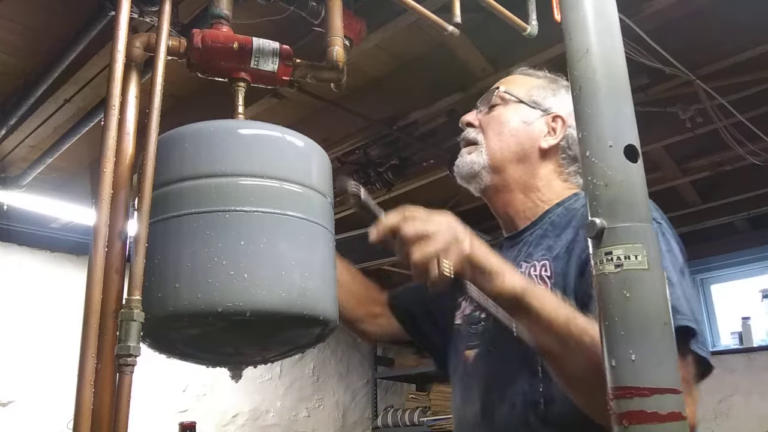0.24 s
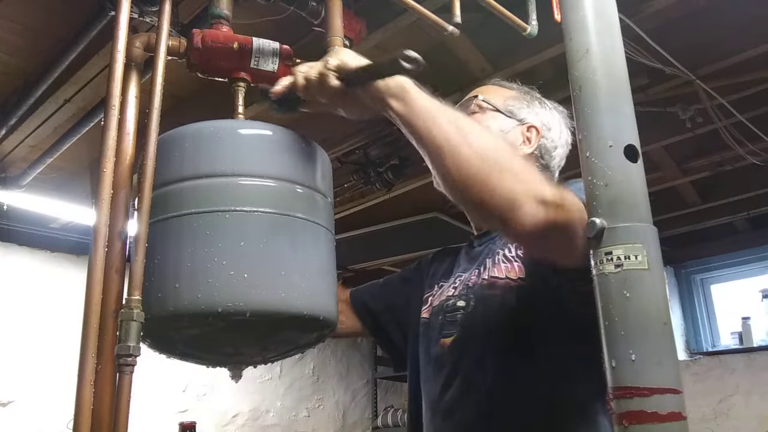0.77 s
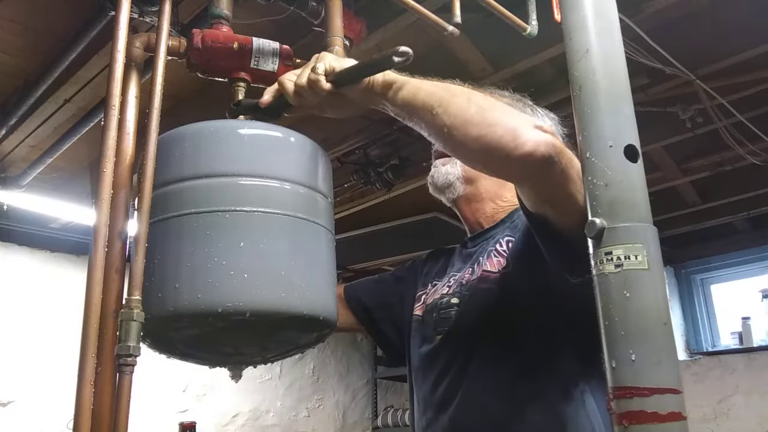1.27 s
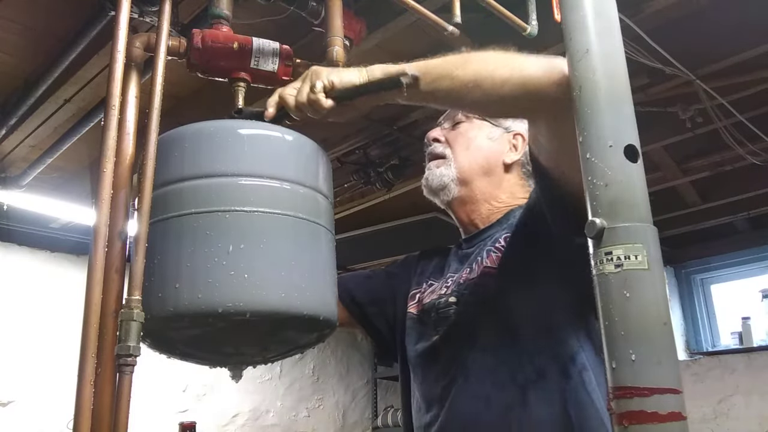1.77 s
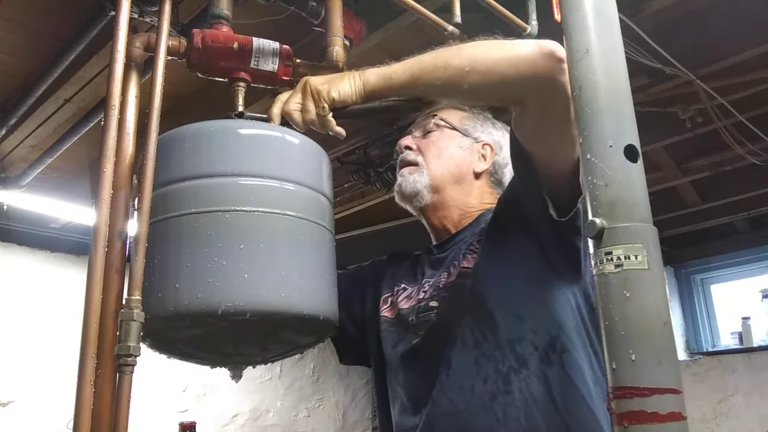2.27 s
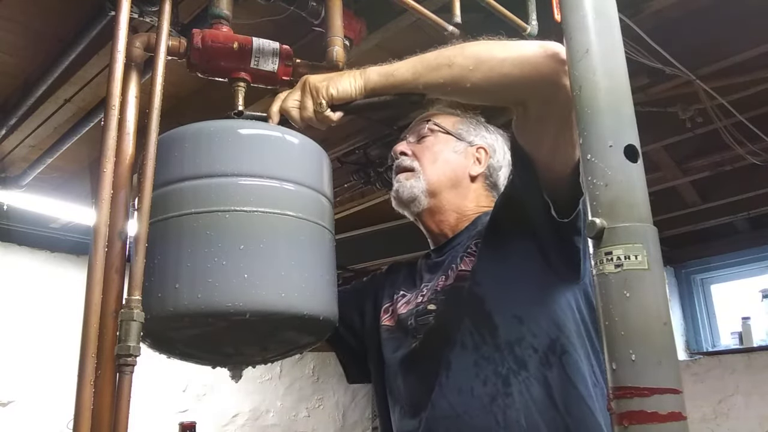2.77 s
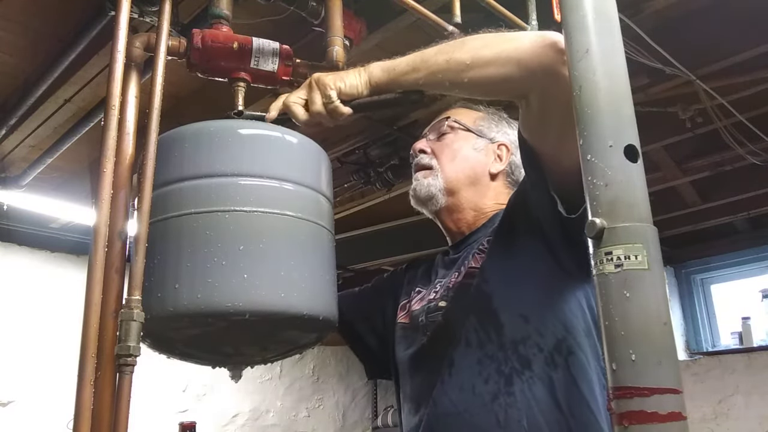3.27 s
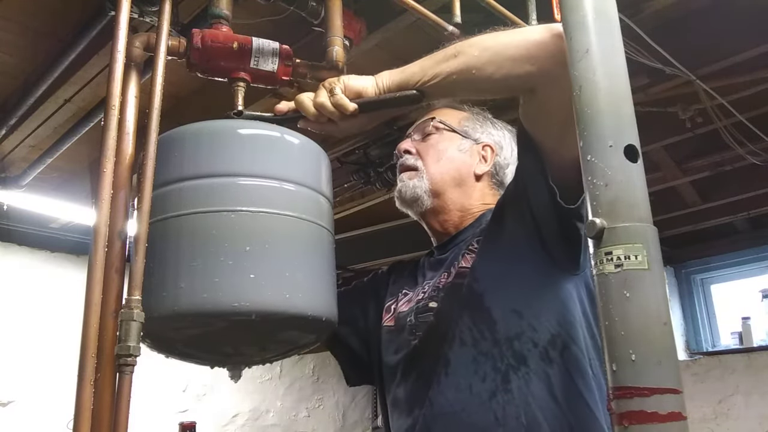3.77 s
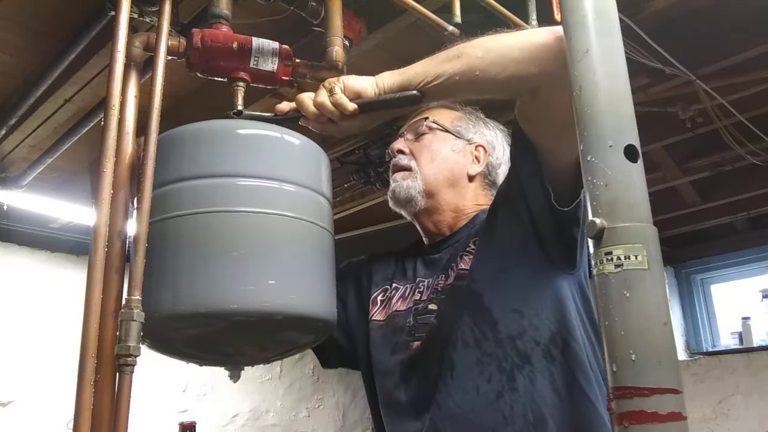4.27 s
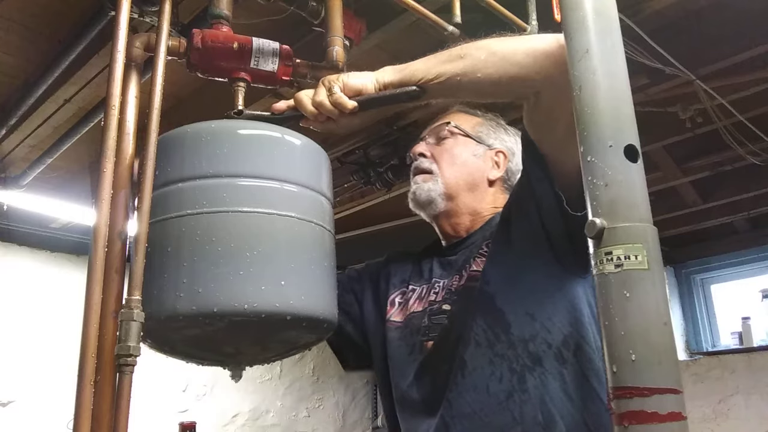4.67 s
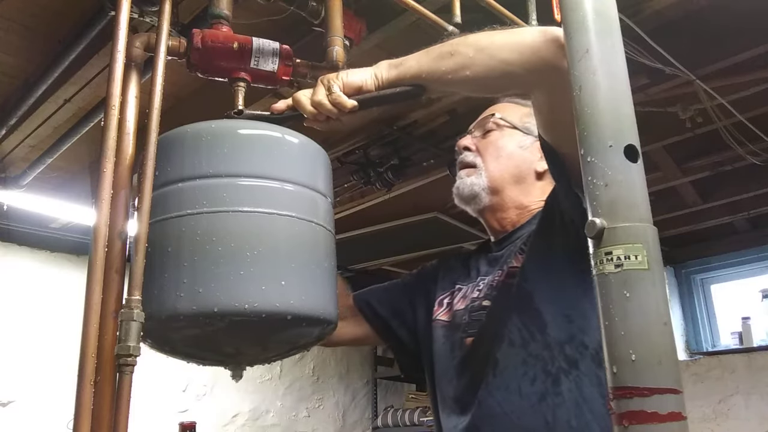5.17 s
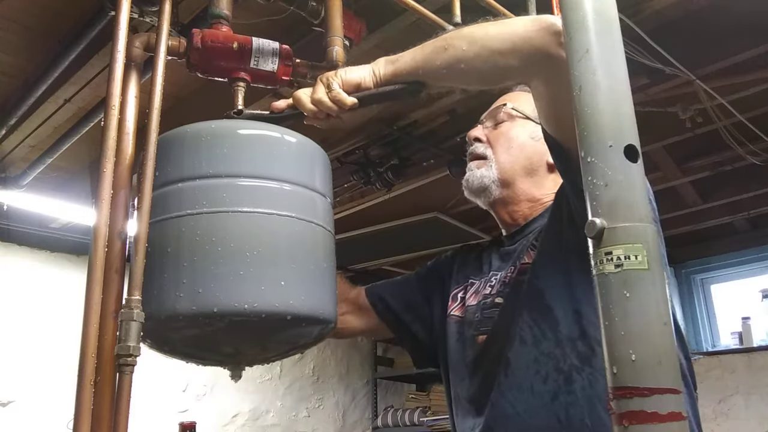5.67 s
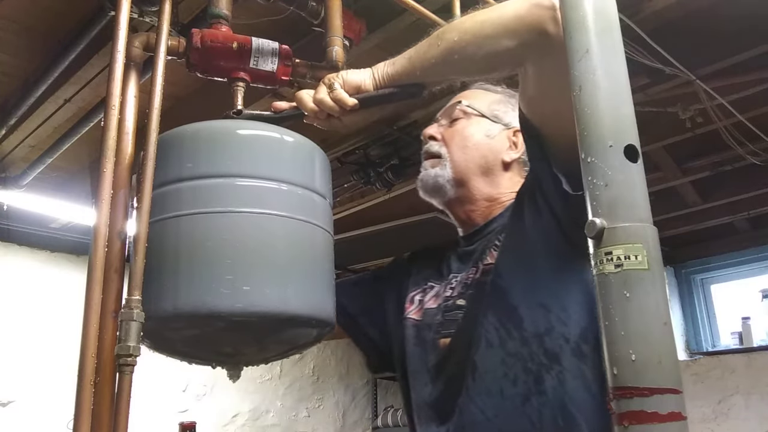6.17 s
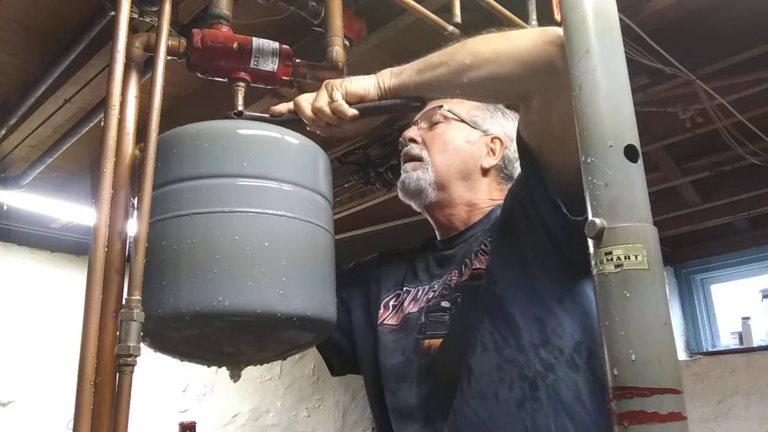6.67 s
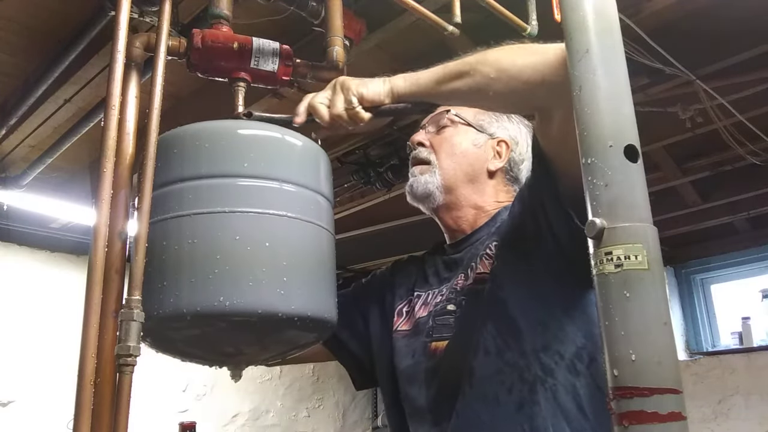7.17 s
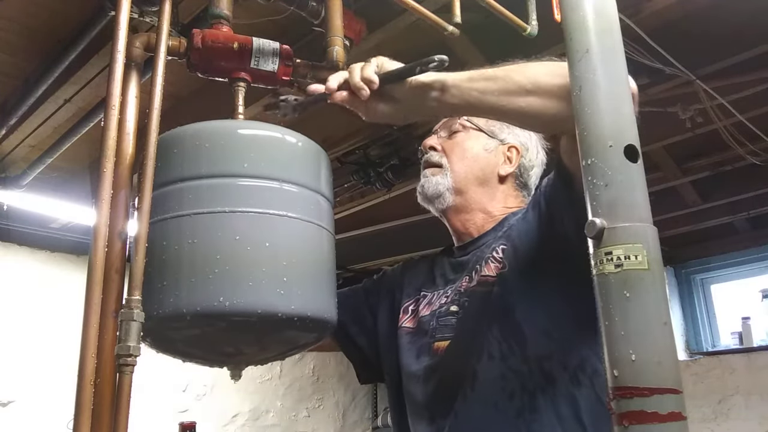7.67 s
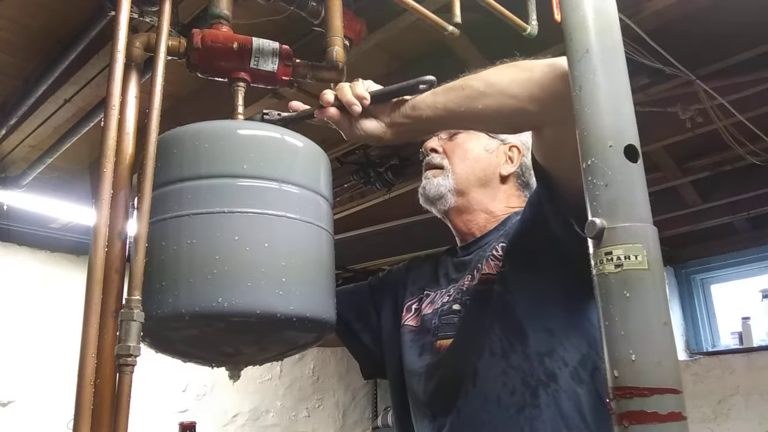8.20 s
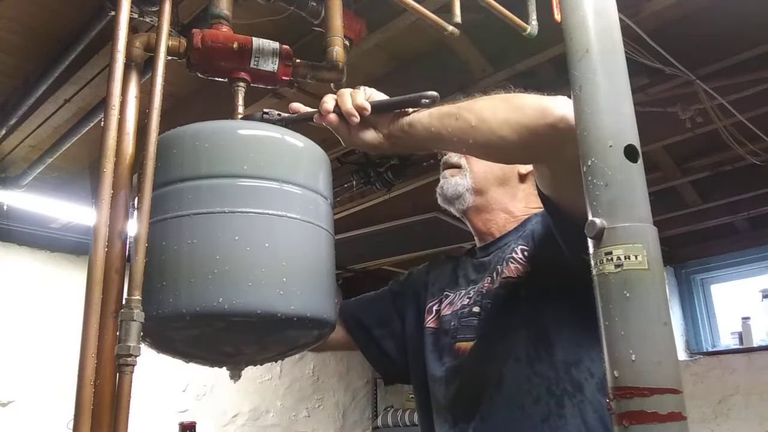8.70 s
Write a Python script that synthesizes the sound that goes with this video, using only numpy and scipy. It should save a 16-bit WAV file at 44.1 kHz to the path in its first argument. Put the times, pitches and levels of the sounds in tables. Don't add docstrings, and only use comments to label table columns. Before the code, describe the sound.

In a basement, a steel wrench works on a brass fitting above a hollow tank. Bright clinks and duller knocks come in uneven clusters, with faint scraping and rattling between them. The loudest clank falls just past the middle, with another knock right after it; a busier run of small taps ends with a sharp clink. A small, thin-sounding microphone catches a short room tail and soft hiss.

```python
import sys
import numpy as np
from scipy import signal
from scipy.fft import rfft, irfft
from scipy.io import wavfile
from scipy.ndimage import uniform_filter1d

SR = 44100
rng = np.random.default_rng(int(sys.argv[2]) if len(sys.argv) > 2 else 0)


def boost_factor(decibels):
    exponent = np.asarray(decibels, float) / 20
    return 10 ** exponent


def pcm_store(signal):
    levels = np.round(np.clip(np.atleast_2d(signal), -1, 1) * 32767)
    wavfile.write(sys.argv[1], SR, levels.astype(np.int16).T)


N = 394254

# pitch in Hz, level in dB, time to fade by 60 dB in seconds.
WRENCH_MODES = [(1930, -6.5, 0.07), (2014, 6.5, 0.025), (2102, -2, 0.034), (2236, 1, 0.017),
                (2434, -2.5, 0.012), (2760, -5, 0.03), (3450, -7, .03), (4030, -5, 0.016),
                (4355, -13.5, 0.027), (4820, -13, 0.022), (4784, -11.5, 0.024), (5740, -19, 0.02),
                (6080, -18, .02), (7350, -30, 0.024)]
# pitch in Hz, level in dB, time to fade by 60 dB in seconds.
FITTING_MODES = [(2370, 0, 0.037), (2455, 3.5, 0.05), (2577, 4, 0.048), (2700, -3.5, 0.047),
                 (2980, -0.5, 0.034), (3150, -6.5, 0.021), (3370, -2.5, 0.041), (3440, -7, .045),
                 (3610, -3.5, 0.08), (3840, -7.5, 0.042), (4395, -2.5, 0.086), (5330, -14, 0.03),
                 (6300, -36.5, 0.027), (7130, -31.5, .035)]
# pitch in Hz, level in dB, time to fade by 60 dB in seconds.
TANK_MODES = [(185, -25.5, 0.019), (267.4, -13, 0.11), (314.2, -8, 0.05), (367, -7, 0.085),
              (420.8, -15, 0.18), (460.5, -12, 0.11), (480, -10.5, 0.05), (556, -7, 0.056),
              (621.8, -4.5, 0.055), (658, -12.5, 0.028), (762.3, -1.5, 0.032), (839, -6, 0.036),
              (962, -8, 0.023), (1128, -5, 0.014), (1320, -18, 0.032), (1438, -7, 0.0088),
              (1740, -11.5, 0.03)]
# pitch in Hz, level in dB, time to fade by 60 dB in seconds.
SWAY_MODES = [(160, -8, 0.04), (185, -0.5, 0.09), (220, -7, 0.05), (250, -7, 0.2)]
# pitch in Hz, level in dB.
PIPES = [(1500, -30), (2000, -1), (2500, 2), (3500, 3.5), (4500, -4), (5200, -15), (6400, -30)]
# pitch in Hz, level in dB.
SHELL = [(220, -10), (330, -2), (470, -2), (640, 0), (850, -5), (1300, -11), (1900, -20)]
# pitch in Hz, level in dB.
CRACK_COLOUR = [(150, -44), (500, -23.5), (1200, -7.5), (2500, 2.5), (4500, 3.5), (6500, -5), (8000, -13),
                (12000, -13.5), (16000, -22)]
PIPES_T60_S, SHELL_T60_S = 0.084, 0.055


def touches():
    out = np.zeros(N)
    bodies = [small_part(WRENCH_MODES), small_part(FITTING_MODES), tank(), rings(SWAY_MODES),
              pipework(PIPES, PIPES_T60_S), pipework(SHELL, SHELL_T60_S, count=50)]
    offsets_db = [-11.5, -5.5, -8, -17, -9.5, -5]
    for s, wrench_db, fitting_db, tank_db, crack_db, length_ms in contacts():
        chatter, fade = jaw_chatter(max(length_ms, .3) / 1000)
        held_db = 12 * max(-36.5 - max(wrench_db, fitting_db, tank_db), 0)
        levels_db = np.add([wrench_db, fitting_db, tank_db, tank_db, fitting_db, tank_db], offsets_db)
        for body, db in zip(bodies, levels_db):
            sound = struck(body, chatter, spread_db=2.5)
            add(out, s - .0002, boost_factor(db - held_db * np.arange(len(sound)) / SR) * sound)
        rough = chatter + 0.4 * rng.standard_normal(4096) * fade
        crack = coloured(np.roll(rough, 64), CRACK_COLOUR)
        loudest = np.sqrt(uniform_filter1d(crack ** 2, 400).max())
        add(out, s - .0016, boost_factor(crack_db + 6.0) * crack / loudest)
    return out


# start in seconds, then wrench, tank and crack level in dB.
CLINKS = [(0.4943, -23, -47, -48), (0.6436, -30, -48, -52), (1.7895, -48.5, -57, -88),
          (3.0475, -34.5, -47, -50), (3.1759, -43, -43, -53), (3.182, -38, -50, -51),
          (3.479, -51, -60.5, -66), (4.547, -30, -41, -59), (4.674, -12, -37, -34),
          (4.679, -15.5, -39, -33), (5.0451, -42, -50, -81), (5.132, -42.5, -53.5, -88),
          (5.169, -39, -56, -73), (5.1801, -46, -49, -67), (5.4535, -35.5, -42.5, -54),
          (5.7953, -54, -50, -80), (6.474, -38, -40.5, -59), (6.6682, -54, -58, -71),
          (6.7943, -29.5, -46, -55), (6.934, -42, -58, -81), (7.6012, -49, -59.5, -92),
          (8.214, -46.5, -53, -63), (8.5576, -41, -40, -62), (8.6214, -31, -48, -52),
          (8.7841, -35, -39.5, -62), (8.9028, -24, -41, -41)]
# start in seconds, then fitting, tank and crack level in dB.
KNOCKS = [(1.2212, -29, -38.5, -66), (1.226, -37, -42, -67), (1.3342, -26, -36, -44), (1.34, -32, -38, -52),
          (1.5678, -89, -59, -60.5), (1.9983, -50, -49.5, -71), (2.0837, -53, -58, -68),
          (2.1935, -41, -34, -58), (2.204, -50, -39, -70), (3.424, -69, -64, -68), (4.491, -42, -51, -57),
          (4.7955, -32, -28.5, -31.5), (4.802, -24.5, -36, -37.5), (5.4343, -39.5, -45, -54),
          (5.5249, -48, -49.5, -58.5), (6.8938, -43.5, -56, -63), (7.1988, -58, -52.5, -74),
          (7.477, -76, -72, -73.5), (7.677, -42.5, -48.5, -52.5), (7.8873, -33, -34, -48),
          (7.955, -42, -38, -76), (8.076, -50.5, -50, -81), (8.154, -41.5, -43, -76),
          (8.167, -51, -52.5, -69), (8.3774, -45, -38, -61)]
# start in seconds, then tank and wrench level in dB.
BUMPS = [(1.9197, -52.5, -59), (2.604, -48.5, -62), (4.5185, -42, -44), (5.562, -52.5, -57),
         (6.0918, -55.5, -62), (6.135, -53.5, -62.5), (6.6046, -53, -53), (6.838, -47.5, -63),
         (7.2552, -61, -70.5), (8.3097, -55, -58), (8.4919, -46, -56)]
# start in seconds, fitting, tank and crack level in dB.
SEATINGS = [(.004, -72, -72, -68), (0.3827, -64, -50.5, -53.5), (0.397, -41, -51, -46),
            (.828, -61, -59, -53), (2.446, -56, -53, -60.5), (2.766, -44.5, -57.5, -67),
            (4.588, -50.5, -62, -52), (8.039, -54, -46.5, -75), (2.328, -55, -46, -62),
            (2.3621, -49, -51, -54), (2.655, -73, -78, -66.5), (3.269, -74, -75, -64),
            (3.8, -82, -75, -70.5), (4.234, -48.5, -52, -65), (7.1, -47.5, -49, -76),
            (8.8079, -57, -36, -55.5)]


def contacts():
    rows = []
    for s, wrench, tank_db, crack in CLINKS:
        rows.append((s, wrench, wrench - 13.5, tank_db, crack, blow_ms(wrench)))
    for s, fitting, tank_db, crack in KNOCKS:
        rows.append((s, fitting - 24, fitting, tank_db, crack, blow_ms(fitting)))
    for s, tank_db, wrench in BUMPS:
        rows.append((s, wrench, wrench - 5.5, tank_db, tank_db - 22, 10.6))
    for s, fitting, tank_db, crack in SEATINGS:
        rows.append((s, fitting - 13, fitting, tank_db, crack, 13.6))
    return rows


def blow_ms(db):
    return 6.73 + 0.01 * db


def jaw_chatter(length):
    t = np.arange(4096) / SR
    late = boost_factor(-12) * np.exp(-t / (4.4 * length))
    seating = np.minimum(t / (0.31 * length), 1)
    fade = (np.exp(-t / length) + late) * (t < .08) * seating
    chatter = rng.standard_normal(4096) * (rng.random(4096) < .06) * fade
    chatter[20] = 0.8
    return chatter, fade


def struck(modes, chatter, spread_db):
    hz, sines = modes
    bins = np.round(np.array(hz) * 8192 / SR).astype(int)
    push = abs(rfft(chatter, 8192))[bins]
    weights = boost_factor(spread_db * rng.standard_normal(len(push))) * rng.choice([-1, 1], len(push))
    even_push = np.maximum(push, 0.37 * np.linalg.norm(chatter))
    sound = signal.fftconvolve(weights / even_push @ sines, chatter)
    return sound / np.sqrt(uniform_filter1d(sound ** 2, 400).max())


def rings(modes):
    hz, db, t60 = np.transpose(modes)[:, :, None]
    t = np.arange(int(min(t60.max(), .65) * SR) + 200) / SR
    return hz[:, 0], boost_factor(db - 60 * t / np.maximum(t60, .002)) * np.sin(2 * np.pi * hz * t)


def split(modes, apart_hz, count=5):
    hz, db, t60 = np.repeat(modes, count, axis=0).T
    step = np.tile(np.linspace(-1, 1, count), len(modes)) + 0.35 * (rng.random(len(hz)) - .5)
    return np.transpose([hz + step * np.repeat(apart_hz, count), db, t60])


def small_part(modes):
    hz, sines = rings(split(modes, .016 * np.array(modes)[:, 0]))
    return hz, signal.sosfilt(signal.butter(2, 1500, "high", fs=SR, output="sos"), sines)


def tank():
    return rings(split(TANK_MODES, .032 * np.array(TANK_MODES)[:, 0], count=3))


def pipework(shape, t60, count=200):
    place, size, ring = rng.random((count, 3)).T
    hz = np.linspace(shape[0][0], shape[-1][0], count) * (1 + 0.01 * place)
    return rings(np.transpose([hz, -9.0 * size + read(shape, hz), t60 * (0.54 + ring)]))


# start in seconds, level in dB, pitch in Hz, fade time
# in seconds.
LOOSE_SPOTS = [(.398, -43.5, 3320, 0.088), (.4945, -41, 2070, 0.05), (.6442, -48, 1930, 0.053),
               (.83, -50.5, 1740, 0.044), (.83, -65, 6450, .06), (.4945, -43, 3380, 0.04),
               (.6442, -38, 2100, .05), (1.2214, -42, 658, 0.06), (1.2214, -38, 4440, .06),
               (1.3344, -48, 3770, 0.47), (1.3344, -39, 620, .06), (1.3344, -28.5, 4510, .03),
               (1.9993, -42.5, 1330, 0.0032), (2.1939, -37, 3310, 0.11), (2.204, -41, 630, 0.05),
               (2.1939, -39, 2470, 0.044), (3.0486, -46.5, 2770, .03), (4.674, -20, 2233, 0.025),
               (3.182, -52, 4670, 0.036), (3.182, -63, 2670, .06), (4.589, -46.5, 5900, 0.018),
               (4.589, -40, 4460, 0.023), (4.547, -41, 4250, 0.014), (4.547, -48, 2710, .03),
               (4.492, -52, 2175, .03), (4.797, -41.5, 7170, .06), (4.797, -61, 754, 1.2),
               (4.797, -36, 1400, 0.04), (4.797, -27, 1002, 0.0053), (4.802, -30.5, 4250, .07),
               (4.797, -19.5, 2600, .016), (5.1803, -46.5, 355, 0.0092), (6.4744, -45, 1250, 0.0046),
               (7.6809, -42.5, 4360, 0.042), (5.435, -45.5, 4020, 0.021), (5.454, -46, 2120, .05),
               (6.796, -48.5, 4830, .04), (7.8878, -41.5, 804, 0.09), (7.8878, -51, 1125, 0.045),
               (7.8878, -37.5, 2443, 0.087), (7.8878, -37, 3380, 0.06), (8.167, -49, 3240, 0.026),
               (8.3785, -41, 635, 0.054), (8.621, -46, 2050, 0.025), (4.68, -33, 2680, 0.032),
               (8.9034, -35.5, 3973, 0.027), (8.9034, -43, 2702, 0.025), (8.8094, -38.5, 620, 0.024),
               (8.9034, -27, 390, 0.013), (.4945, -50, 1930, 0.15),
               (2.204, -40, 781, .05), (2.1945, -40, 441, .1), (2.1945, -47, 2240, .06),
              (3.0475, -50, 307, .06), (3.0475, -48, 614, .04), (3.0475, -51, 4400, .03),
              (3.1759, -47, 450, .05), (3.182, -54, 1430, .02), (8.3774, -50, 910, .03),
              (8.3774, -52, 1290, .03), (8.3774, -54, 361, .04), (8.3774, -53, 4450, .03),
              (7.8873, -38, 2340, .07), (7.8873, -36, 474, .08), (7.955, -42, 450, .08),
              (1.2212, -38, 3750, .04), (1.226, -33, 2400, .04), (1.226, -38, 3300, .07),
              (1.3342, -35, 3750, .05), (1.34, -34, 2420, .05), (1.34, -36, 3300, .08),
              (.4943, -45, 2420, .05), (.4943, -44, 2200, .04), (8.9028, -38, 3350, .03),
              (8.214, -52, 450, .03), (2.3621, -48, 3250, .04), (.6436, -46, 2600, .05),
              (.828, -54, 4500, .05), (4.674, -24, 2120, .04), (7.677, -54, 640, .03),
              (8.9028, -39, 640, .03), (5.4343, -47, 320, .08), (1.2212, -41, 460, .12),
              (4.5185, -46, 480, .1)]


def spots():
    out = np.zeros(N)
    times = np.array([row[0] for row in contacts()])
    for s, db, hz, t60 in LOOSE_SPOTS:
        rattle = rng.standard_normal(1200) * np.exp(-np.arange(1200) / 320.0)
        apart_hz = min(3.6 / t60, 0.028 * hz)
        body = rings(split([(hz, 0, t60)], [apart_hz]))
        nearest = times[abs(times - s).argmin()]
        add(out, nearest, boost_factor(db) * struck(body, rattle, spread_db=2.5))
    return out


# pitch in Hz, level in dB.
SCRAPE_COLOUR = [(300, -27), (1000, -2.5), (2200, -1.5), (4500, -3), (6000, -12), (8000, -22), (12000, -17),
                 (16000, -29)]


def rubbing():
    grains = boost_factor(2.14 * np.minimum(rng.exponential(1, N), 3.5))
    grains = grains * (rng.random(N) < .08) * rng.choice([-1, 1], N)
    slips = evened(uniform_filter1d(rng.standard_normal(N), 400))
    grains = evened(grains * boost_factor(3.2 * slips))
    bright = pressure(grip_db=-3.5, body=2, settle_db=-34, slide=3)
    dull = pressure(grip_db=-0.5, body=3, settle_db=-17, slide=4)
    fitting = rings(FITTING_MODES)[1].sum(0)
    wall = pipework(SHELL, SHELL_T60_S, count=50)[1].sum(0)
    bare = boost_factor(-7.5) * bright * evened(coloured(grains, SCRAPE_COLOUR))
    in_fitting = signal.oaconvolve(bright * grains, fitting / np.linalg.norm(fitting))[:N]
    in_tank = signal.oaconvolve(dull * grains, wall / np.linalg.norm(wall))[:N]
    return bare + boost_factor(-23.5) * in_fitting + boost_factor(-10.0) * in_tank


# time in seconds, grip in dB.
GRIP = [(0.0, -67), (.4, -80), (.9, -70), (1.2, -73), (1.75, -61), (2.2, -59), (2.9, -70.5), (3.6, -70),
        (4.3, -62), (5.1, -59.5), (5.65, -63), (5.85, -69.5), (6.55, -58.5), (7.05, -62.5), (7.5, -69.5),
        (8.05, -55), (8.5, -67), (8.94, -75)]
# peak, rise and fall in seconds, then scrape and dull level in dB.
SLIDES = [(0.01, 0.043, 0.007, -48, -73), (.07, 0.0096, 0.021, -55, -81), (0.191, 0.04, 0.027, -54.5, -75),
          (.405, 0.024, 0.044, -37.5, -81), (2.38, 0.13, 0.051, -56, -84), (2.69, 0.024, 0.028, -53.5, -60),
          (2.786, 0.028, 0.014, -46.5, -62), (2.88, 0.031, 0.043, -59.5, -84),
          (3.175, .015, .004, -56, -70), (1.333, 0.014, .004, -45, -68), (7.93, .03, 0.066, -58, -50),
          (8.41, 0.027, .03, -56, -50), (3.282, 0.032, 0.081, -61, -71), (3.84, 0.026, 0.084, -63, -79),
          (3.96, 0.022, 0.027, -61.5, -78), (4.03, 0.023, 0.016, -59, -87), (4.27, 0.016, 0.019, -46, -57),
          (6.15, 0.048, 0.082, -80.5, -72), (2.16, 0.022, 0.15, -59, -59), (5.65, 0.091, 0.069, -66.5, -64),
          (7.02, 0.02, 0.059, -60, -54.5), (7.691, 0.13, 0.085, -60, -61), (7.12, 0.041, 0.06, -53, -62),
          (7.39, 0.019, 0.0073, -73.5, -55.5), (8.17, 0.027, 0.027, -55, -45),
          (8.82, 0.08, 0.072, -42.5, -47)]


def pressure(grip_db, body, settle_db, slide):
    t = np.arange(0, N, 64) / SR
    gain = boost_factor(np.interp(t, *np.transpose(GRIP)) + grip_db)
    for touch in contacts():
        since = np.maximum(t - touch[0], 0)
        shuffle = (1 - np.exp(-since / 0.055)) * np.exp(-since / 0.081)
        gain = gain + boost_factor(touch[body] + settle_db) * shuffle
    for row in SLIDES:
        s, rise, fall = row[:3]
        swell = np.exp(-((t - s) / np.where(t < s, rise, fall)) ** 2)
        gain = gain + boost_factor(row[slide]) * swell
    return np.repeat(gain, 64)[:N]


# start and length in seconds, pitch in Hz, level and octave level in dB.
SQUEAKS = [(.83, .05, 780, -53, -70), (1.81, .1, 1650, -72, -90), (1.68, .22, 720, -72, -90),
           (1.97, .22, 3350, -68, -90), (2.12, .12, 4430, -68, -90), (8.04, .11, 3450, -66, -90),
           (4.25, .055, 880, -59, -66), (4.25, .055, 310, -59, -75), (6.12, .2, 880, -69, -80),
           (7.08, .17, 4430, -68, -90), (7.1, .18, 860, -69, -85), (8.44, .05, 680, -61, -85),
           (8.725, .055, 2080, -58, -85)]


def squeaks():
    out = np.zeros(N)
    for s, length, hz, db, octave_db in SQUEAKS:
        waver = evened(uniform_filter1d(rng.standard_normal(SR // 4), 200))[:round(length * SR)]
        turn = 2 * np.pi * np.cumsum(hz * (1 + 0.02 * waver)) / SR
        tone = boost_factor(db) * np.sin(turn) + boost_factor(octave_db) * np.sin(2 * turn)
        flutter = boost_factor(3.5 * waver[::-1] - 4.0)
        add(out, s, tone * flutter * signal.windows.tukey(len(turn), .5))
    return boost_factor(7.0) * out


# pitch in Hz, time to fade by 60 dB in seconds.
BASEMENT_FADE = [(150, 0.33), (500, 0.36), (2000, 0.26), (5000, 0.26), (12000, 0.25)]


def basement(x):
    taps = np.zeros(SR // 2)
    at = np.arange(100, len(taps) - 20, 20)
    taps[at + rng.integers(0, 20, len(at))] = rng.choice([-1., 1.], len(at))
    hz, t, z = signal.stft(taps, SR, nperseg=256)
    fade = boost_factor(-60 * t / read(BASEMENT_FADE, hz)[:, None])
    tail = signal.istft(z * fade, SR, nperseg=256)[1]
    return signal.fftconvolve(x, tail / np.linalg.norm(tail))[:N]


# pitch in Hz, level in dB per Hz.
HISS_COLOUR = [(18, -58), (30, -29), (141, -37), (165, -12.5), (266, -6.5), (384, -10), (426, -1.5),
               (461, -6.5), (600, -7.5), (866, -11.5), (1630, -13), (2480, -15.5), (4300, -19), (5450, -31),
               (16000, -21)]


def room_tone():
    return boost_factor(-66.5) * evened(coloured(rng.standard_normal(N), HISS_COLOUR))


def evened(x):
    return x / np.sqrt(np.mean(x ** 2) + 1e-20)


def read(points, hz):
    f, value = np.transpose(points)
    return np.interp(np.log(hz + 1), np.log(f + 1), value)


def add(mix, s, sound):
    part = mix[round(s * SR):][:len(sound)]
    part += sound[:len(part)]


def coloured(x, points):
    return irfft(rfft(x) * boost_factor(read(points, np.fft.rfftfreq(len(x), 1 / SR))), len(x))


def scene():
    metal = touches() + spots() + rubbing() + squeaks()
    return (metal + boost_factor(-4.5) * basement(metal) + room_tone())[None]


# pitch in Hz, level in dB.
SELF_NOISE_COLOUR = [(20, -2.5), (60, -5), (120, -2.5), (300, -5), (16000, -17)]


def microphone(dry):
    heard = signal.sosfilt(signal.butter(8, 160, "high", fs=SR, output="sos"), dry)
    heard = heard + boost_factor(-51) * dry
    heard = heard + boost_factor(-84) * evened(coloured(rng.standard_normal(N), SELF_NOISE_COLOUR))
    band_limit = signal.firwin(301, 15850, window=("kaiser", 5), fs=SR)
    return signal.oaconvolve(heard, band_limit[None], "same")


def low_pass(x):
    return signal.sosfilt(signal.butter(12, 16800, fs=SR, output="sos"), x)


def record(dry):
    mix = microphone(dry)
    return low_pass(mix)


dry = scene()
out = record(dry)
pcm_store(out)
```